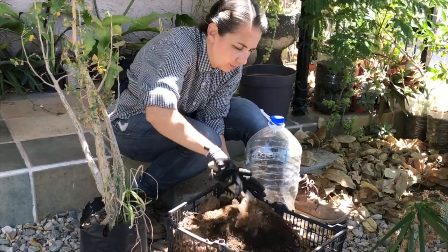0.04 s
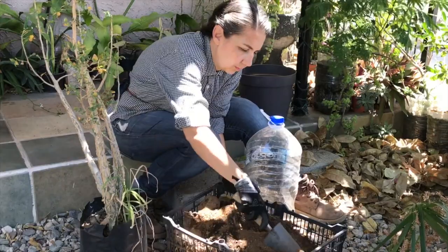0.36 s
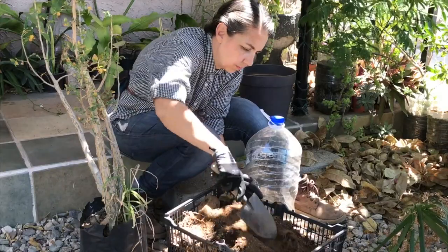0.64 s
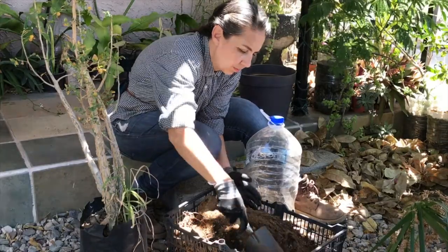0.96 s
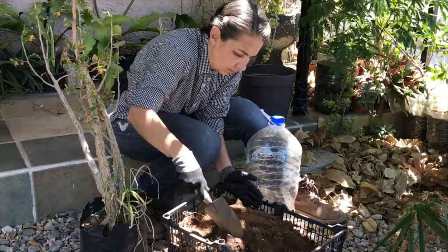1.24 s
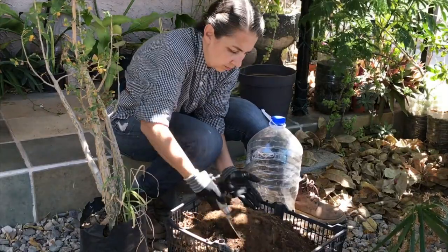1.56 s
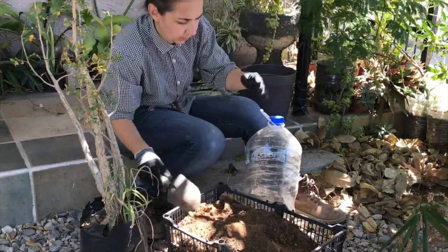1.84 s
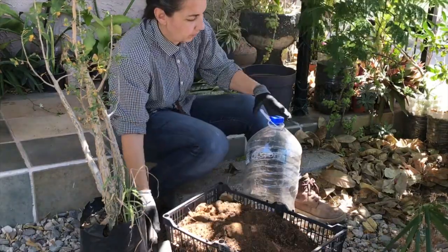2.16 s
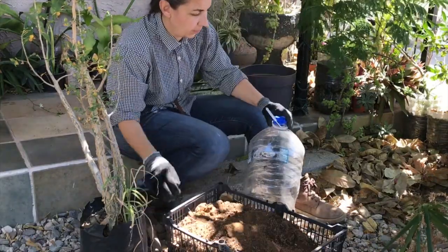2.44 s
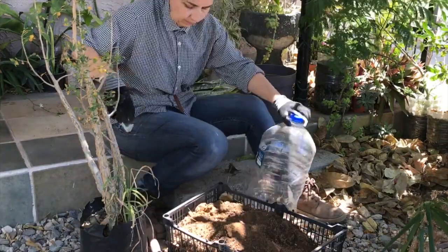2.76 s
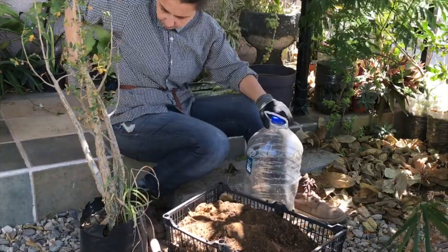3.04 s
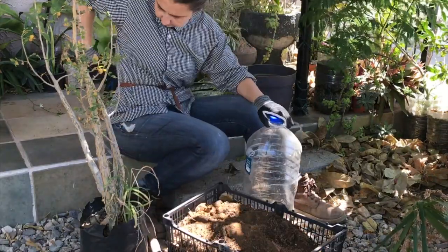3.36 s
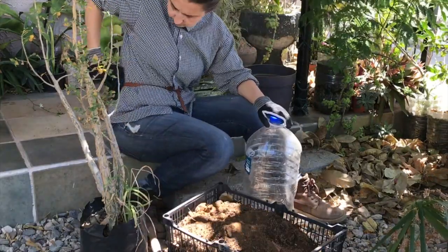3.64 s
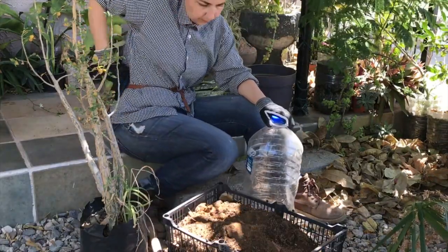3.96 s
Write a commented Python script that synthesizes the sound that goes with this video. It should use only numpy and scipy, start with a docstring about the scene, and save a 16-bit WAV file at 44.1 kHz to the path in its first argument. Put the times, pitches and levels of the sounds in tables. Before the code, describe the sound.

A trowel scrapes through dry soil, then clinks down on stone.

```python
"""A quiet garden, one microphone near a crate of dry soil. A steel trowel scrapes through it, grains
rasping on the blade among soft rubs, short ticks and trickling crumbs. The trowel is laid on stone
with a clink and a clatter, then a big plastic bottle scuffs the ground as it is tipped up.
Far off a small bird whistles; low rumble, a distant engine and one dull bump lie under it all."""
import sys
import numpy as np
from scipy import signal
from scipy.fft import rfft, irfft, next_fast_len
from scipy.io import wavfile
from scipy.ndimage import map_coordinates

SR = 44100
rng = np.random.default_rng(int(sys.argv[2]) if len(sys.argv) > 2 else 0)


def generate_wav(sig):
    """Save sig (samples, or channels by samples) to the path in sys.argv[1] as 16-bit PCM at SR."""
    pcm = np.round(np.clip(np.atleast_2d(sig).T, -1, 1) * 32767).astype(np.int16)
    wavfile.write(sys.argv[1], SR, pcm)


N = 176400

# spectrum of dry soil grains: frequency_hz, level_db
SOIL_SPECTRUM = [(400, -1.5), (1200, 9.5), (2000, 7.5), (3400, 7.5), (5000, 1.5), (7000, 2.5), (10000, 0),
                 (15500, -6)]
# modes of the steel blade: pitch_hz, level_db, t60_s
BLADE_MODES = [(1563, -8, .11), (1780, -3.5, .14), (1879, -1.5, .27), (1971, -6, .1), (2363, -9, .14),
               (2838, -5, .12), (3043, -5, .1), (3626, -3.5, .15), (4030, 0, .06), (5277, -3, .085),
               (6125, -2, .08), (8470, 0, .065), (10190, -10, .075), (12200, -8, .05), (14390, -14, .07)]


def amp(db):
    """Decibels to gain."""
    return 10 ** (np.asarray(db) / 20)


def unit(x):
    """Scale to rms 1."""
    return x / np.sqrt(np.mean(x ** 2) + 1e-20)


def clock():
    """The time of every sample."""
    return np.arange(N) / SR


def along(points, hz):
    """Interpolate (Hz, value) points on a log axis."""
    f, v = np.transpose(points)
    return np.interp(np.log(hz + 1), np.log(f), v)


def wobble(rate):
    """A smooth random curve, rate knots a second."""
    return map_coordinates(rng.standard_normal(1200), [clock() * rate + 2], mode="mirror")


def filtered(x, response):
    """x times a response of frequency."""
    m = next_fast_len(len(x) + 8192)
    return irfft(rfft(x, m) * response(np.fft.rfftfreq(m, 1 / SR)), m)[:len(x)]


def coloured(x, spectrum):
    """x with the given spectrum, at rms 1."""
    return unit(filtered(x, lambda hz: amp(along(spectrum, hz))))


def tilted(x, slope_db):
    """x brightened by so many dB per octave, at rms 1."""
    return unit(filtered(x, lambda hz: amp(slope_db * np.log2(np.maximum(hz, 800) / 4000))))


def ragged(x, depth_db):
    """x through many fine random peaks and notches, as near reflections make them."""
    knots = rng.standard_normal(400)
    return unit(filtered(x, lambda hz: amp(depth_db * map_coordinates(knots, [hz / 90], mode="mirror"))))


def add(track, s, x):
    """Mix x into the track at time s."""
    start = max(round(s * SR), 0)
    track[start:start + len(x)] += x[:N - start]


def swell(peak_s, rise_s, fall_s):
    """A stroke's envelope: 20 dB up over the rise, 20 dB down over the fall."""
    t = clock() - peak_s
    return amp(-20 * np.maximum(-t / rise_s, t / fall_s))


def grains(rate, spread_db):
    """Random tiny impacts of uneven size."""
    impacts = (rng.random(N) < rate / SR) * rng.choice([-1, 1], N)
    return unit(impacts * amp(spread_db * rng.standard_normal(N)))


def burst(spectrum, slope_db, t60):
    """A short crack of coloured noise."""
    t = np.arange(8192) / SR
    noise = ragged(coloured(rng.standard_normal(len(t)), spectrum), depth_db=4)
    return tilted(noise, slope_db) * amp(-60 * t / t60)


def background():
    """The bed of the garden: uneven deep rumble, steady outdoor air and a faint hum."""
    # rise and fall of the rumble: time_s, relative_level_db
    rumble_levels = [(0, -43), (.65, -44.5), (1.05, -44.5), (1.2, -54), (1.45, -50), (1.65, -47),
                     (1.85, -49.5), (2.9, -45), (3.1, -49), (3.4, -43), (3.75, -52.5), (4, -38)]
    # spectrum of the rumble: frequency_hz, level_db
    rumble_spectrum = [(10, -15.5), (25, -5.5), (40, 1), (60, -5), (100, -12), (160, -28.5), (300, -36.5),
                       (600, -81)]
    # spectrum of the air: frequency_hz, level_db
    air_spectrum = [(40, -8), (75, 2.5), (110, 2), (165, 0.5), (230, -6), (400, -16), (700, -20),
                    (1400, -24.5), (3000, -31.5), (6000, -37.5), (10000, -44), (15500, -46)]
    rumble_db = 2 + np.interp(clock(), *np.transpose(rumble_levels))
    rumble = coloured(rng.standard_normal(N), rumble_spectrum) * amp(rumble_db)
    air = coloured(rng.standard_normal(N), air_spectrum) * amp(-54 + 0.1 * wobble(3.79))
    hum_hz = 319.4 + 1.6 * wobble(5.96)
    hum = amp(-69 + 1.8 * wobble(5)) * np.sin(2 * np.pi * np.cumsum(hum_hz) / SR)
    return rumble + air + hum


def engine():
    """A distant engine carries as one low, wavering tone that swells and recedes."""
    # course of the drone: time_s, pitch_hz, level_db
    drone = [(.42, 140.3, -46.5), (.6, 142.1, -57), (.85, 138.1, -47.5), (1.05, 131.6, -56.5),
             (1.3, 134.4, -48.5), (1.6, 133.8, -57.5), (1.8, 134, -63)]
    s, hz, db = np.transpose(drone)
    level_db = np.interp(clock(), s, db) + 2.2 * wobble(9.03)
    pitch_hz = np.interp(clock(), s, hz) + wobble(10)
    return amp(level_db) * np.sin(2 * np.pi * np.cumsum(pitch_hz) / SR)


def rubbing():
    """Soft, dull brushing close by, about five rubs a second."""
    # rubs between the strokes: peak_s, rise_s, fall_s, level_db
    rubs = [(.06, 0.21, 0.2, -66), (.255, 0.026, 0.16, -65.5), (.46, 0.049, 0.12, -62.5),
            (0.667, 0.041, 0.093, -63), (.87, 0.031, 0.25, -69)]
    # their spectrum: frequency_hz, level_db
    spectrum = [(600, -5), (1400, -1), (2100, 1), (3000, 1.5), (3800, -8), (5200, -15), (6900, -9),
                (9000, -35)]
    brush = ragged(coloured(rng.standard_normal(N), spectrum), depth_db=-1.5)
    return brush * sum(amp(db) * swell(s, rise, fall) for s, rise, fall, db in rubs)


def ticks():
    """Short bright ticks: grit in the soil, and the sharp top of the trowel striking stone."""
    # ticks of grit and of steel on stone: start_s, level_db, brightness_db_per_octave
    timed_ticks = [(0.097, -56, -2), (0.452, -58, 5), (.486, -46, 17), (.796, -63, -0.5), (1.46, -58.5, 0),
                   (2.267, -50.5, 3), (2.405, -47, 14), (2.526, -46.5, 15.5), (2.874, -47, 15)]
    strays_per_s, stray_db, stray_slope = 7, -68, 3  # fainter crumbs at random times
    draws = rng.random((round(strays_per_s * N / SR), 2))
    strays = [(when * N / SR, stray_db + 10 * (size - .5), stray_slope) for when, size in draws]
    out = np.zeros(N)
    for s, db, slope in timed_ticks + strays:
        add(out, s, amp(db) * burst(SOIL_SPECTRUM, slope, t60=.022))
    return out


def resonance(hz, centre, width):
    """The response of one damped mode."""
    return 1j * hz * width / (centre ** 2 - hz ** 2 + 1j * hz * width)


def buried_blade(frequencies):
    """The blade's modes, damped and detuned by soil and weighted anew by where the grains touch."""
    response = 0
    for hz, db, _ in BLADE_MODES:
        gain = amp(db + np.log2(hz / 4000) + rng.normal(0, 2))  # soil chokes the low modes most
        detuned_hz = hz * rng.normal(1, .03)
        response += gain * resonance(frequencies, detuned_hz, width=130 * np.sqrt(hz / 4000))
    return response


def digging():
    """Grains rasp along the blade and excite its damped resonances, differently at each depth."""
    # strokes in the soil: peak_s, rise_s, fall_s, level_db, brightness_db_per_octave, ring_hz
    strokes = [(.357, 0.012, 0.05, -55, 1, 3500), (0.368, 0.06, 0.11, -59.5, 1.5, 11200),
               (.47, 0.063, 0.14, -67, -3, 4060), (0.892, 0.022, .06, -62.5, -1.5, 3100),
               (0.924, 0.03, 0.068, -60.5, 0, 4700), (1.045, .05, .03, -64.5, 2, 6900),
               (1.079, 0.018, 0.07, -61, 0.5, 6550), (1.32, 0.048, 0.13, -63, 1.5, 6900),
               (1.393, 0.035, 0.076, -55, 3, 13200), (1.432, 0.035, 0.06, -60.5, 0, 7400),
               (1.463, .01, 0.042, -65, 1, 8000)]
    steel_db, ring_db = -12, -8
    out = np.zeros(N)
    for s, rise, fall, db, slope, ring_hz in strokes:
        start = max(s - .2, 0)
        span = slice(round(start * SR), round(start * SR) + SR // 2)
        grit = grains(rate=2400, spread_db=3.5)[span]
        steel = amp(steel_db) * unit(filtered(grit, buried_blade))
        rasp = ragged(tilted(coloured(grit, SOIL_SPECTRUM) + steel, slope), depth_db=5.5)
        ring = amp(ring_db) * unit(filtered(grit, lambda hz: resonance(hz, ring_hz, width=450)))
        add(out, start, amp(db) * swell(s, rise, fall)[span] * unit(rasp + ring))
    return out * amp(1.5 * wobble(120))  # the level flickers


def trickle():
    """Loose crumbs fall off the blade and settle."""
    # spills of soil: peak_s, rise_s, fall_s, level_db
    spills = [(.6, .12, 0.13, -78), (1.892, 0.056, 0.049, -65.5), (2.49, 0.18, 0.42, -68.5)]
    crumbs = tilted(coloured(grains(rate=1500, spread_db=3.5), SOIL_SPECTRUM), slope_db=-2.0)
    return crumbs * sum(amp(db) * swell(s, rise, fall) for s, rise, fall, db in spills)


def bird():
    """A small bird far off: thin, mostly falling whistles with a slight quaver."""
    # whistles: start_s, length_s, start_hz, end_hz, level_db
    notes = [(.938, .098, 4850, 3350, -65.5), (1.265, .06, 4700, 4850, -73), (2.55, .06, 4600, 3900, -74),
             (3.275, .05, 4800, 4760, -71), (3.305, .1, 4150, 3550, -77)]
    out = np.zeros(N)
    for s, length, start_hz, end_hz, db in notes:
        progress = np.linspace(0, 1, int(length * SR))
        quaver = 1 + 0.0168 * wobble(569)[:len(progress)]
        hz = (start_hz + (end_hz - start_hz) * progress) * quaver
        add(out, s, amp(db) * np.sin(np.pi * progress) * np.sin(2 * np.pi * np.cumsum(hz) / SR))
    return out


def surges():
    """The deep rumble swells for a few cycles now and then."""
    # bass swells: peak_s, length_s, pitch_hz, level_db
    swells = [(1.006, .14, 42.4, -36), (1.57, 0.1015, 40.1, -33), (2.61, 0.062, 44, -32.5),
              (3.36, 0.0905, 53.5, -36), (3.456, 0.13, 44.7, -34)]
    out = np.zeros(N)
    for s, length, hz, db in swells:
        t = np.arange(int(length * SR)) / SR
        tone = np.sin(2 * np.pi * (hz * t + rng.random()))
        add(out, s - length / 2, amp(db) * np.hanning(len(t)) * tone)
    return out


def bump():
    """A dull bump whose pitch drops at once into the deep bass."""
    start_s, length_s, level_db = 1.943, 0.081, -26.5
    start_hz, end_hz, sag_s = 221, 30.5, 0.0075
    out, t = np.zeros(N), np.arange(int(length_s * SR)) / SR
    hz = end_hz + (start_hz - end_hz) * np.exp(-t / sag_s)
    envelope = (1 - np.exp(-t / 0.0046)) * np.cos(np.pi / 2 * t / length_s)
    add(out, start_s, amp(level_db) * envelope * np.sin(2 * np.pi * np.cumsum(hz) / SR))
    return out


def trowel_on_stone():
    """Each contact with the stone chokes the ring before it, cracks and rings the blade anew."""
    # contacts: start_s, ring_db, crack_db, crack_t60_s, brightness_db_per_octave
    knocks = [(2.2667, -53.5, -37.5, 0.016, -5), (2.3598, -38.5, -37.5, 0.043, -1.5),
              (2.366, -47.5, -40.5, 0.025, 4), (2.3702, -49.5, -33.5, 0.028, 2),
              (2.387, -56, -50, 0.032, 3), (2.405, -52, -53, .03, -4.5), (2.444, -74, -55, 0.026, 18),
              (2.5236, -58.5, -51.5, 0.031, -6.5)]
    # spectrum of steel striking stone: frequency_hz, level_db
    crack_spectrum = [(300, -5.5), (1050, -10), (1550, 1), (1850, 9), (2450, -14), (3200, 3), (4000, 4.5),
                      (4600, -15.5), (5600, -3), (7000, -5.5), (9200, -15), (15500, -23)]
    choke_db, choke_s, attack_s = -9, .002, .00025
    blade, cracks, t = np.zeros(N), np.zeros(N), np.arange(SR // 2) / SR
    for s, ring_db, crack_db, crack_t60, slope in knocks:
        blade *= amp(choke_db * np.clip((clock() - s) / choke_s, 0, 1))
        dulling = 1.7 * min(slope, 0)  # a soft contact barely wakes the high modes
        ring = 0
        for hz, db, t60 in BLADE_MODES:
            mode_db = db + dulling * np.log2(hz / 2000) + rng.normal(0, 0.61)
            ring += amp(mode_db - 60 * t / t60) * np.sin(2 * np.pi * (hz * t + rng.random()))
        add(blade, s, amp(ring_db) * ring * (1 - np.exp(-t / attack_s)))
        add(cracks, s, amp(crack_db) * burst(crack_spectrum, slope, crack_t60))
    return blade + cracks


def bottle():
    """The bottle's thin plastic base drags over grit."""
    # scuffs on the ground: peak_s, rise_s, fall_s, level_db
    scuffs = [(2.805, 0.018, 0.053, -63), (2.837, 0.022, 0.039, -62.5), (2.87, 0.037, 0.053, -54.5),
              (2.981, 0.024, 0.036, -64.5)]
    # spectrum of the scraped plastic: frequency_hz, level_db
    spectrum = [(250, -2), (450, 2), (700, -4), (1000, 6), (1700, -6), (3500, -1), (7000, -6), (11000, -5),
                (15500, -7.5)]
    rasp = coloured(grains(rate=3500, spread_db=-1.5), spectrum)
    return rasp * sum(amp(db) * swell(s, rise, fall) for s, rise, fall, db in scuffs)


def garden(x, wet_db, direct_db=0):
    """x plus its short scatter from steps, wall and plants."""
    # decay of the scatter: frequency_hz, t60_s
    decay = [(200, 0.67), (2000, 0.15), (6000, 0.17), (15000, 0.13)]
    hz, t, noise = signal.stft(rng.standard_normal(SR // 2), SR, nperseg=256)
    tail = signal.istft(noise * amp(-60 * t / along(decay, hz)[:, None]), SR, nperseg=256)[1]
    scatter = signal.fftconvolve(np.pad(x, (200, 0)), tail / np.linalg.norm(tail))[:N]
    return amp(direct_db) * x + amp(wet_db) * scatter


def scene():
    """The work close up, the far bird with more of the garden's scatter, the low sounds beneath."""
    work = rubbing() + ticks() + digging() + trickle() + trowel_on_stone() + bottle()
    near = garden(work, wet_db=-7.5)
    far = garden(bird(), wet_db=-4, direct_db=-0.5)
    return (near + far + background() + engine() + surges() + bump())[None]


def record(dry):
    """One microphone into a recorder that keeps nothing above its band limit."""
    top_hz = 15850
    return filtered(dry[0], lambda hz: hz < top_hz)[None]


dry = scene()
out = record(dry)
generate_wav(out)
```